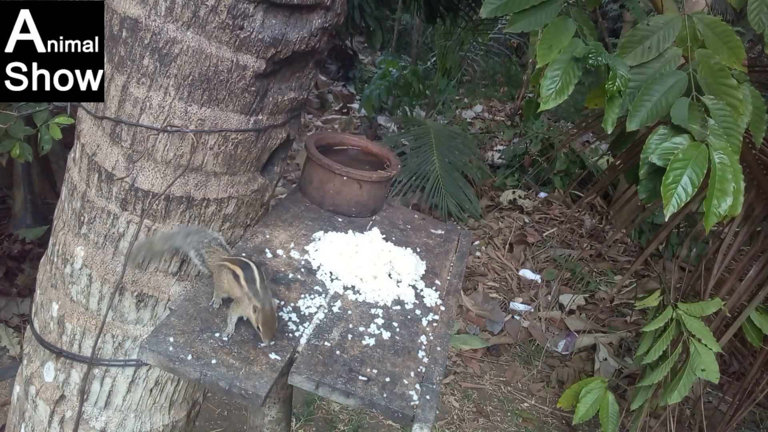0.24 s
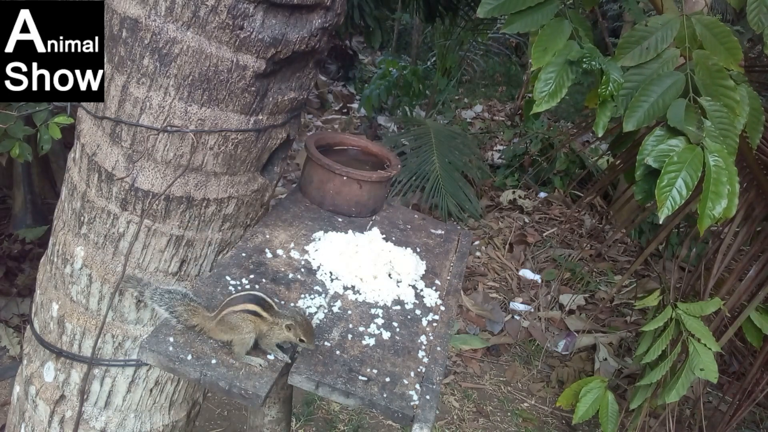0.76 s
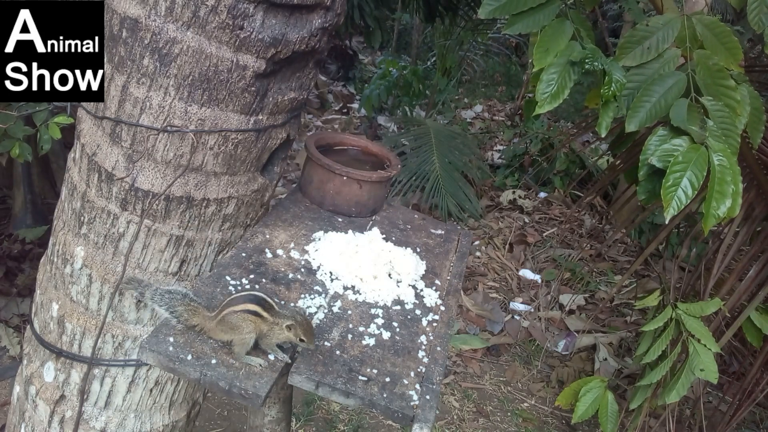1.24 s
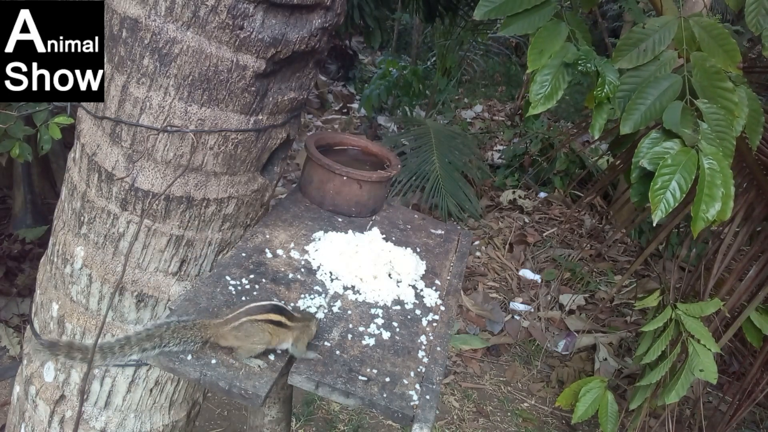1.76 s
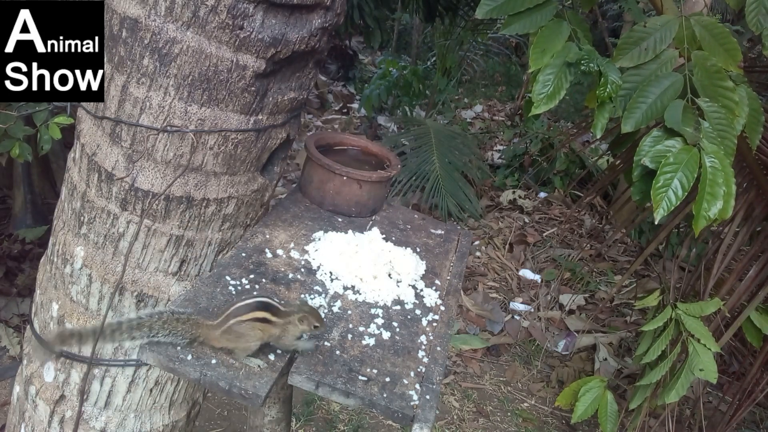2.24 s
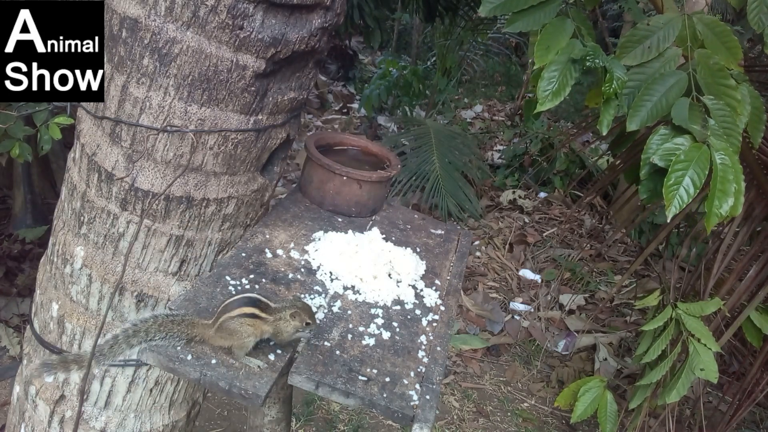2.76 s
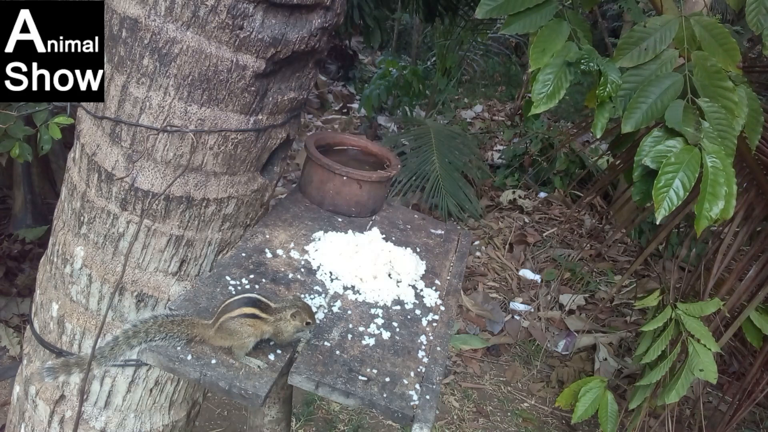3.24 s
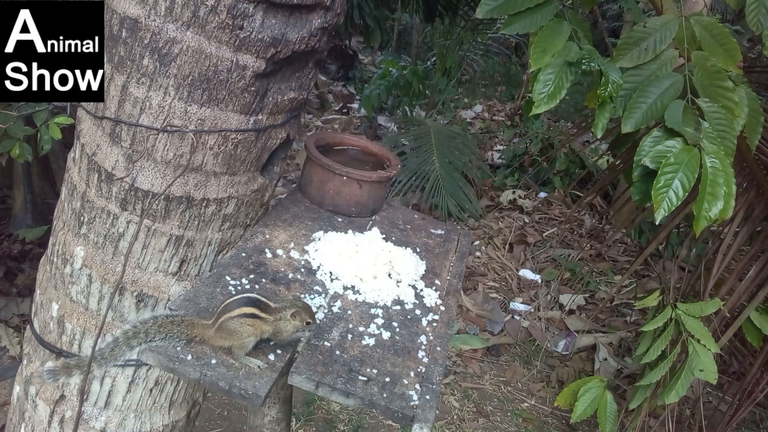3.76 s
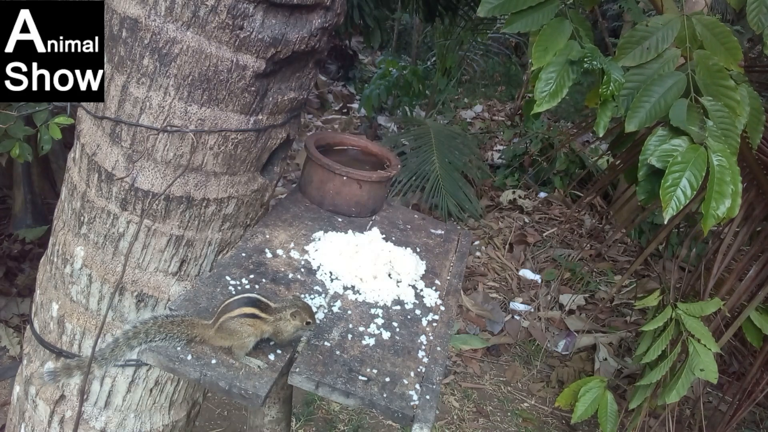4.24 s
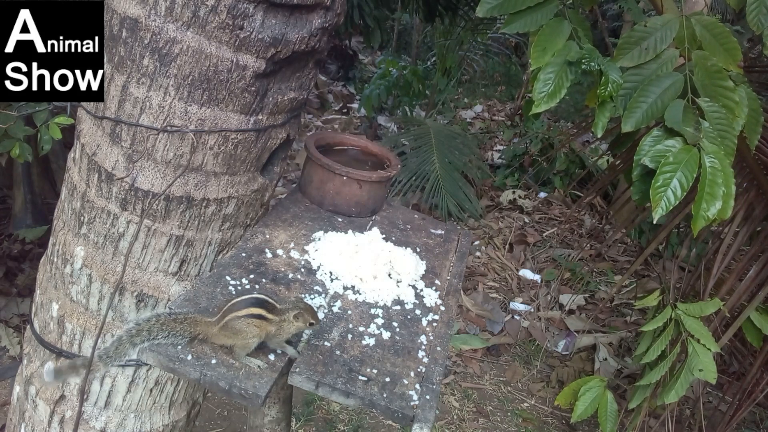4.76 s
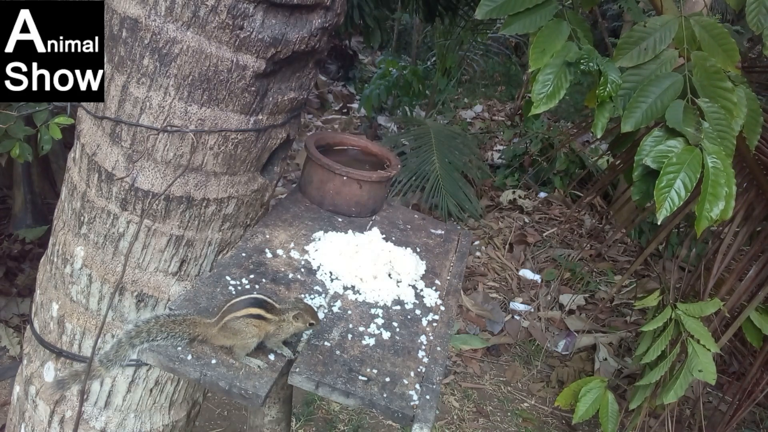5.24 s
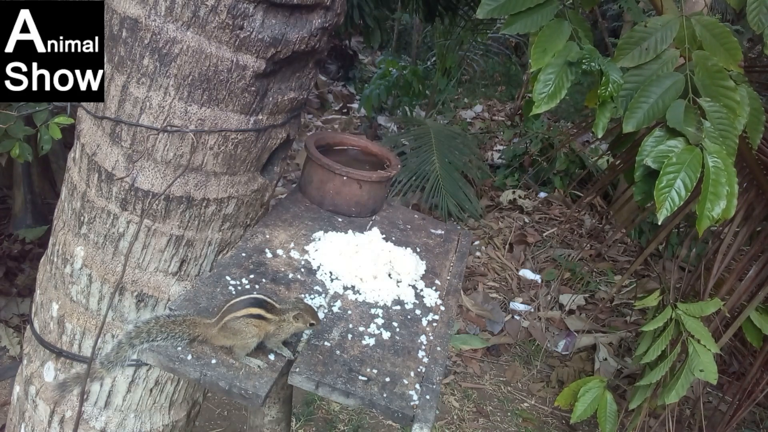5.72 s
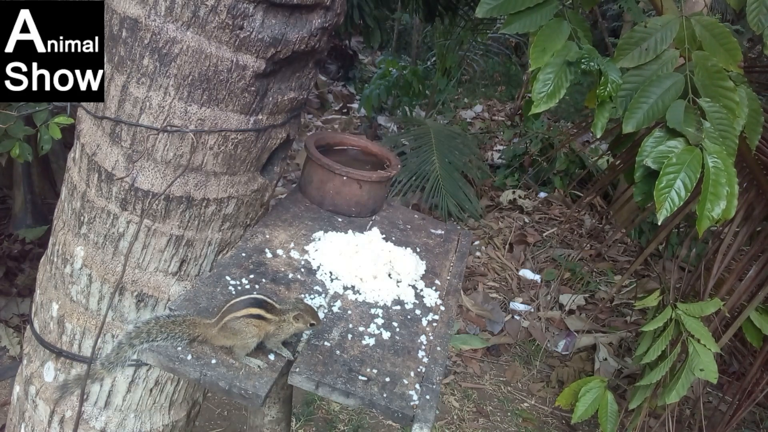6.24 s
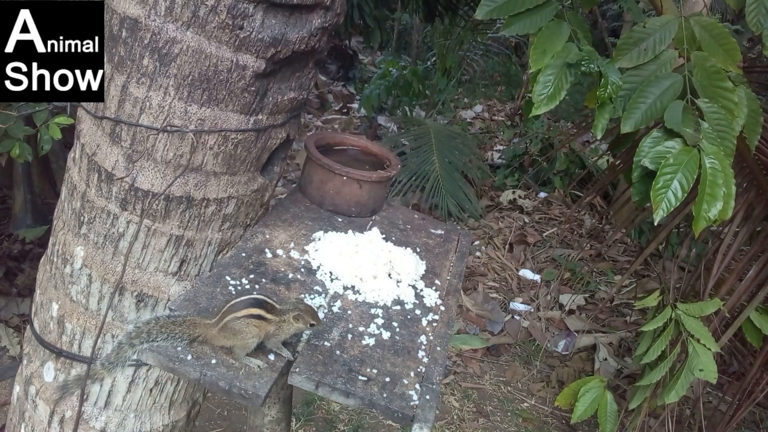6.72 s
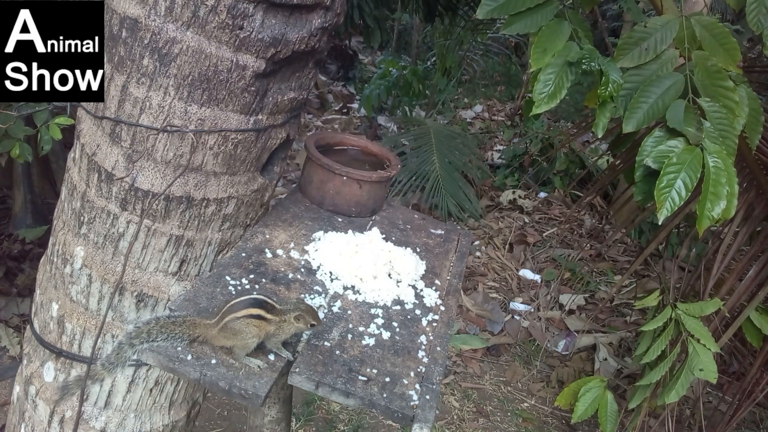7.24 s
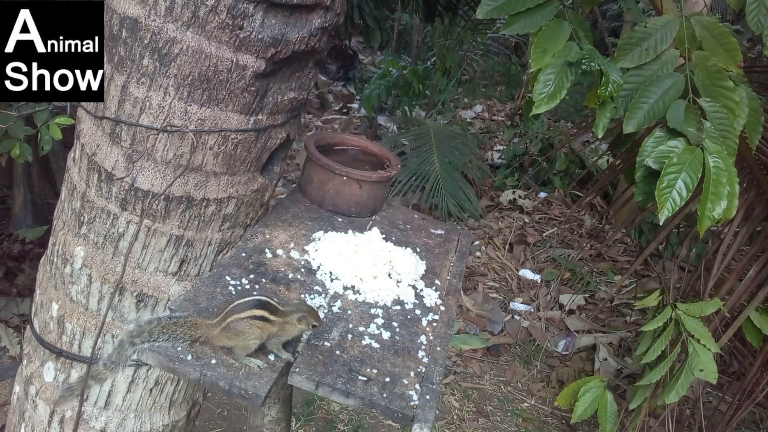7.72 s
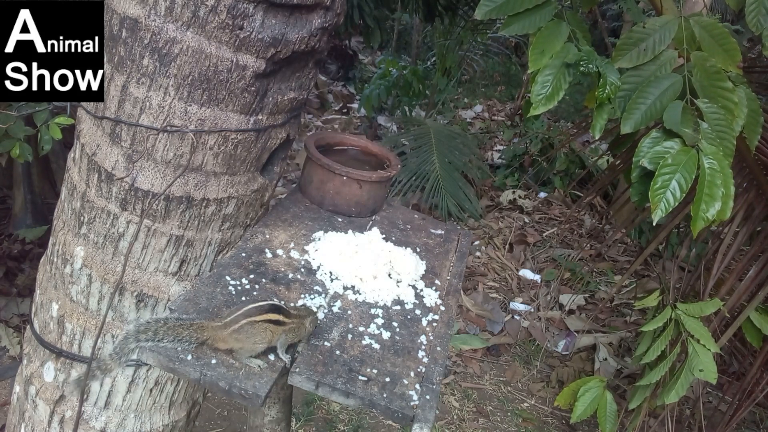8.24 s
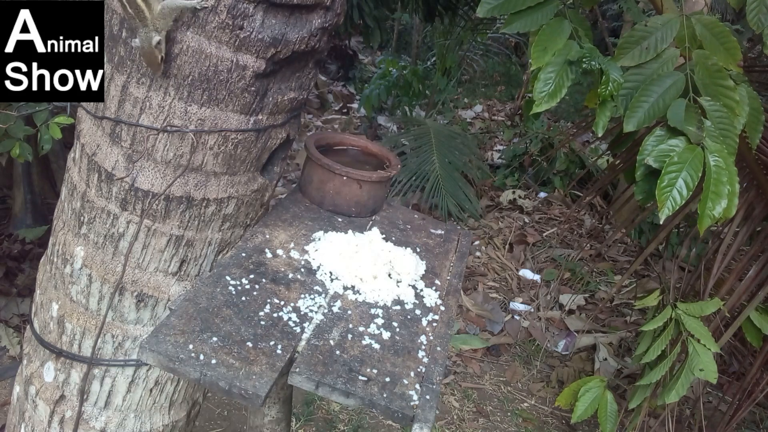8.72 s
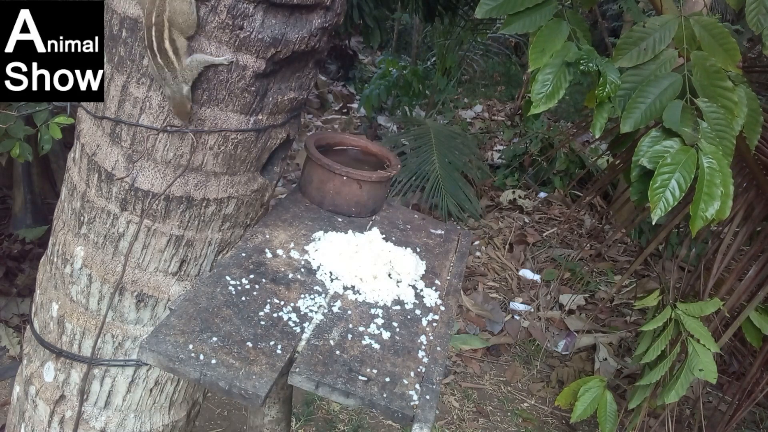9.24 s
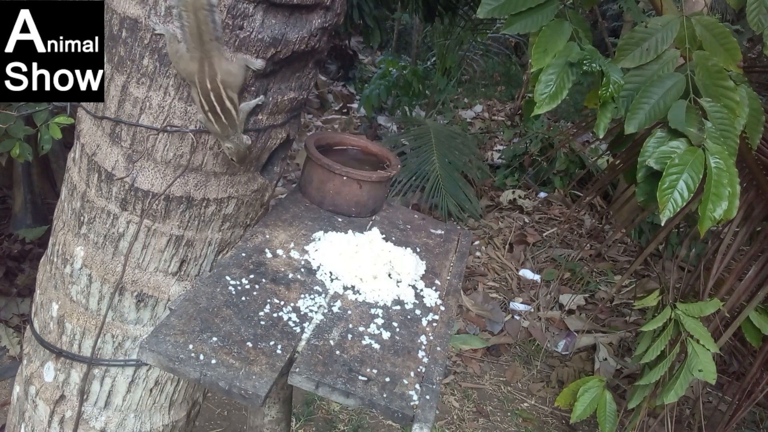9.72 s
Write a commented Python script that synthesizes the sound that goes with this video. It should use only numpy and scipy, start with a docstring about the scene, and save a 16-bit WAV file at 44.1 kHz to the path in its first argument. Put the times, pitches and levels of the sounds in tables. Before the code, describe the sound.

Short, bright, slightly hoarse squirrel chirps echo off walls and leaves. One strong chirp opens, then soft background with distant bird whistles. Midway, light metal rattling grows into two hard blows, deep panel boom and a metallic latch clank, by far the loudest moment. Afterwards the squirrel chirps repeatedly in quick, uneven succession and stops, leaving faint claw scuffs, a tick, birds and low outdoor rumble. The single outdoor microphone picks up everything in mono.

```python
"""A palm squirrel chirps on a stone feeding table in a walled garden: harmonics of a gliding pitch
pass through throat resonances. Its claws scratch on stone and bark, as short bursts of noise.
Out of sight sheet metal, likely a gate, rattles, booms and slams on its latch: struck modes and dying noise.
Far away birds whistle as gliding tones; insects, traffic, rumble and air are shaped noise.
Echoes off walls and leaves set the distance of all but the gate and the background."""
import sys
import numpy as np
from scipy import signal
from scipy.fft import rfft, irfft, next_fast_len
from scipy.io import wavfile
from scipy.ndimage import map_coordinates

SR = 44100
rng = np.random.default_rng(int(sys.argv[2]) if len(sys.argv) > 2 else 0)


def pcm_store(signal):
    """Save signal as 16-bit PCM."""
    levels = np.round(np.clip(np.atleast_2d(signal), -1, 1) * 32767)
    wavfile.write(sys.argv[1], SR, levels.astype(np.int16).T)


N = 440118

# Chirps: (t/s, held pitch f/Hz, level/dB, octave level/dB, higher overtones level/dB, echoes level/dB)
CHIRP_NOTES = [(-.1, 2325, -42, 7, -5, -1.5), (.065, 2354, -39, 0.5, -2, -1),
               (.248, 2552, -24, 1.5, -18.5, -7.5), (3.979, 2200, -35, 2, -1.5, -2.5),
               (4.317, 2146, -33.5, 2, 1.5, -6), (4.603, 2585, -27.5, 2.5, -6, -1.5),
               (6.002, 2547, -37, 4, -4, 3), (6.266, 2520, -31.5, 12, -1, -3.5),
               (6.373, 2186, -36, -2.5, -3, -1), (6.524, 2255, -37, 3, -2.5, .5),
               (6.656, 2584, -34.5, 4, 1.5, 5), (6.868, 2534, -30, -0.5, 0, 1),
               (7.13, 2536, -29.5, 7, 1.5, 3), (7.338, 2487, -36.5, 6, 5, 2), (7.458, 2495, -34, 5, 3.5, 4),
               (7.574, 2479, -30.5, 7, 2, 2.5), (7.74, 2486, -33, 7, 5, 4),
               (7.992, 2480, -36.5, 4, 3.5, 3.5), (8.189, 2443, -39, 4, 4, 4.5),
               (8.387, 2453, -38, 4.5, 3.5, 3.5)]
# Squeaks that flick up as the voice catches: (t/s, level/dB)
SQUEAK_NOTES = [(0.243, -53), (3.971, -41), (4.31, -39.5), (4.598, -49), (5.996, -54.5), (6.259, -49.5),
                (6.371, -54)]
# Response of the squirrel's throat: (f/Hz, level/dB)
THROAT_RESPONSE = [(1400, -52), (2000, -1.5), (2500, 0.5), (3200, -11.5), (4200, -11.5), (4600, -20.5),
                   (5100, -13), (6100, -3), (7400, -20), (8600, -20), (9900, -34), (11100, -21),
                   (11600, -22.5), (12400, -19), (13300, -22), (15000, -34)]
USUAL_HZ, USUAL_DB = 2500, -34  # the usual chirp, from which the others depart
HOLD_S, HOLD_S_PER_OCTAVE = .024, 0.0266  # notes below the usual pitch are held longer
ROUGH, ROUGH_PER_OCTAVE = 0.23, 1.27  # and are hoarser
HOLD_S_PER_DB, ROUGH_PER_DB = .0004, 0.03  # brighter notes are shorter and hoarser
FALL_DB, FALL_TOP_DB = -8, -4.5  # level of the closing fall: usual and highest
FALL_DB_PER_DB, FALL_DB_PER_OCTAVE = 0.8, 68  # loud and high notes cut off more cleanly
# Pitch: the rise into the note (s, fraction) and its creep while held (fraction per s)
SCOOP_S, SCOOP_DEPTH, CREEP_PER_S = 0.01313, 0.2492, 1
SAG_S, SAG_DEPTH, RELEASE_S = .017, .18, 0.0039  # the closing fall: s, fraction of pitch, s
SAG_ROUGH = 0.35  # the voice breaks up as it falls
SQUEAK_S, SQUEAK_FROM_HZ, SQUEAK_TO_HZ = 0.0188, 4950, 6210

# Sharp ticks of claws, twigs and metal: (t/s, peak level/dB, centre f/Hz)
TICK_TIMES = [(.2, -32, 2290), (2.523, -52, 2500), (4.221, -30, 1180), (4.858, -24.5, 3480),
              (6.84, -33, 2500), (6.949, -35, 1440), (9.41, -40.5, 1640), (9.429, -50, 3500)]
# Scuffs of feet and tail: (t/s, length/s, level/dB, centre f/Hz)
SCUFF_TIMES = [(.29, .04, -59.5, 600), (1.036, .094, -71, 5030), (1.464, .068, -66, 4420),
               (2.898, .19, -63, 5800), (3.093, .11, -62.5, 6050), (4.118, .16, -52, 2200),
               (5.329, .07, -64, 8700), (6.794, 0.31, -57.5, 6000), (6.809, .15, -54.5, 1520),
               (8.679, 0.14, -66, 6960), (9.232, .16, -61.5, 1710), (9.266, 0.13, -59, 7400)]
# Claws catch at random during a scuff: rate, middle peak over the scuff's level and its spread
SNAGS_PER_S, SNAG_DB, SNAG_SPREAD_DB = 30, 9, 5
CONTACT_WIDTH = 1.7  # bandwidth over centre of each of the three filter stages for ticks and scuffs

# Blows on the gate: (t/s, clatter level/dB, boom level/dB, hardness of contact f/Hz, swell/s)
GATE_BLOWS = [(4.02, -47.5, -58, 600, .003), (4.118, -47.5, -62, 3500, 0.0034),
              (4.156, -45, -65, 3500, .003), (4.217, -36.5, -46.5, 1500, 0.0013),
              (4.857, -30, -24, 13000, 0.02), (5.426, -27, -33.5, 15000, 0.011)]
# Booming modes of the gate's panel: (f/Hz, level/dB, t60/s)
PANEL_MODES = [(66.4, -7, 2.56), (92, 0, 1.7), (101.3, -8, 1.8), (120.3, -2, 1.75), (140, -8.5, 1.57),
               (182.7, -14.5, 1.4), (205.6, -9.5, 1.02), (269.7, -3.5, 0.97), (415, -14, 1.13),
               (488, -19, 1.2), (651, -22, 1.4), (703, -25, 1.1), (818, -17.5, 1.35), (1047, -21, 1.1)]
# Ringing modes of the gate's steel latch: (f/Hz, level/dB, t60/s)
LATCH_MODES = [(2440, -5, 0.4), (3960, -13, 0.22), (5120, -2.5, 0.3), (5470, -8, 0.5), (5800, -10, 0.38),
               (6730, -3, 0.48), (7360, -5, 0.47), (7620, -3, 0.32), (9900, 0, 0.21), (11030, 0, 0.2),
               (12480, -5, 0.32), (13010, -9, 0.26), (13290, -9, 0.27)]
# The panel's crowded higher modes: (f/Hz, level per Hz/dB)
CLATTER_COLOUR = [(25, -32), (55, -5), (105, 3), (160, -5), (230, 2), (330, -10.5), (420, -7.5),
                  (650, -11.5), (1050, -14), (1350, -18), (1700, -25), (3900, -28), (5500, -32),
                  (8500, -34.5), (15500, -43.5)]
# Decay of those modes, before a heavy blow stretches it: (f/Hz, t60/s)
CLATTER_DECAY = [(100, 0.85), (400, 0.83), (1200, 0.77), (5000, 0.74), (14000, 0.62)]
HEAVY_DB = -31.5  # from this clatter level up a blow moves the whole panel
LATCH_S, LATCH_DB = 5.433, -31.5  # the latch catches on the last blow
RATTLE_TILT_DB = 7  # lighter blows are thinner
FREE_RING = 1.61  # a heavy blow clatters this many times longer while the latch is still open

# A far bird's phrase, a rising slur and an arch:
# (delay t/s, length/s, first f/Hz, middle f/Hz, last f/Hz, octave level/dB)
BIRD_PHRASE = [(0, .3, 1940, 2097, 2200, -0.5), (.19, .21, 2250, 2443, 2160, -11.5)]
# When that phrase is sung: (t/s, slur level/dB, arch level/dB)
BIRD_SONGS = [(.37, -75, -68.5), (1.54, -70, -65.5), (2.6, -71.5, -67), (3.42, -82, -75),
              (8.43, -84, -64.5), (9.65, -74.5, -66)]
# Other birds' single slurs: (t/s, first f/Hz, last f/Hz, level/dB)
BIRD_SLURS = [(1.87, 2214, 2070, -66), (2.08, 4880, 4720, -72.5), (3.49, 4400, 4940, -64.5),
              (3.58, 4760, 3770, -67), (3.8, 6200, 4760, -71), (3.86, 3680, 3780, -75),
              (5.69, 4880, 4500, -69), (8.85, 3050, 2880, -71), (9.42, 4800, 4480, -72)]
SLUR_S, QUAVER = 0.11, 0.0144  # length of a slur; unsteadiness of all whistles (fraction of pitch)

# Course of the background before and after the gate, ahead of the offsets below:
# (t/s, rumble level/dB, bass level/dB)
BACKGROUND_LEVELS = [
    [(0.0, -63.5, -64.5), (1.12, -67.5, -69.5), (1.31, -65, -69), (3.9, -65.5, -69)],
    [(6.5, -59, -63), (8.41, -60, -65.5), (8.76, -61.5, -62), (9.98, -62, -64.5)],
]
# Colour of the rumble and its bass: (f/Hz, level per Hz/dB)
RUMBLE_COLOUR = [(22, -16), (42, -5), (65, 1), (100, -4), (160, -10.5), (260, -8), (400, -12.5), (700, -12),
                 (1000, -20), (1800, -22.5), (4000, -29), (15500, -38.5)]
# Colour of the outdoor air: (f/Hz, level per Hz/dB)
AIR_COLOUR = [(500, 6.5), (1500, -2), (2300, 2.5), (3300, 2), (5200, -5.5), (8500, -15), (12500, -9),
              (15500, -21)]
# Swells of far traffic: (middle t/s, half length/s, level/dB)
TRAFFIC_PASSES = [(1.5, 0.65, -66), (2.702, 0.3, -64.5), (3.85, 0.35, -69.5), (8.2, 2.4, -72.5)]
DRONE_DB = -84  # floor under the traffic swells
RUMBLE_DB = 0.62  # offset on the course of the rumble
BASS_DB, BASS_BELOW_HZ = 3, 138  # offset on the course of the bass; its upper edge

# First echoes off the walls, each delay varied by up to a tenth: (delay t/s, level/dB)
WALL_ECHOES = [(.0065, -10.5), (0.0112, -11.5), (.016, -10), (.022, -19), (.031, -23), (.043, -32.5)]
# Decay of the garden's far tail: (f/Hz, t60/s)
GARDEN_DECAY = [(500, 1), (2500, 0.72), (6000, 0.74), (13000, 0.16)]
TOP_HZ = 15750  # upper band limit of the microphone channel


def squirrel():
    """Chirps shaped by their pitch and force, and squeaks; echoes change as the animal turns its head."""
    out = np.zeros(N)
    outdoors = lambda x, echo_db: garden(x, echo_db, near_db=-4, near_t60=.26, far_db=-14)
    for s, hz, db, octave_db, bright_db, echo_db in CHIRP_NOTES:
        octaves_low = np.log2(USUAL_HZ / hz)
        hold = HOLD_S + HOLD_S_PER_OCTAVE * octaves_low - HOLD_S_PER_DB * bright_db
        rough = np.clip(ROUGH + ROUGH_PER_OCTAVE * octaves_low + ROUGH_PER_DB * bright_db, 0, 1)
        fall_db = FALL_DB - FALL_DB_PER_DB * (db - USUAL_DB) + FALL_DB_PER_OCTAVE * octaves_low
        note = chirp(hz, octave_db, bright_db, hold, min(fall_db, FALL_TOP_DB), rough)
        add(out, s, amp(db) * outdoors(note, echo_db))
    for s, db in SQUEAK_NOTES:
        add(out, s, amp(db) * outdoors(squeak(), echo_db=-4))
    return out


def chirp(hz, octave_db, bright_db, hold, fall_db, rough):
    """One note: it scoops up, locks on its pitch, then sags and turns hoarse."""
    t = clock(0.25)
    scoop = np.clip(1 - t / SCOOP_S, 0, 1)
    sag = np.clip((t - hold) / SAG_S, 0, 1.2)
    hoarse = rough + SAG_ROUGH * sag
    jitter = .052 * hoarse * wobble(1400, len(t))
    lift = CREEP_PER_S * (np.minimum(t, hold) - .017)  # the held pitch creeps upward as pressure builds
    pitch = hz * (1 - SCOOP_DEPTH * scoop ** 2 + lift - SAG_DEPTH * sag) * (1 + jitter)
    phase = 2 * np.pi * np.cumsum(pitch) / SR
    voice = amp(along(THROAT_RESPONSE, pitch)) * np.sin(phase)
    for k in range(2, 8):
        # overtones come in once the pitch has locked, and each flutters on its own
        flutter_db = (2 + 4 * hoarse) * wobble(260, len(t))
        overtone_db = (octave_db if k == 2 else bright_db) - 0.45 - 28 * scoop + flutter_db
        voice += amp(along(THROAT_RESPONSE, k * pitch) + overtone_db) * np.sin(k * phase)
    breath = rng.standard_normal(len(t))
    rasp = unit(filtered(breath, lambda f: amp(along(THROAT_RESPONSE, f)) * (f > 1.4 * hz)))
    # clean notes snap in, hoarse ones swell
    opening = 1 / (1 + np.exp(-(t - .0105) / (0.0018 + 0.01 * rough)))
    release = 1 / (1 + np.exp((t - hold - .018) / RELEASE_S))
    closing = amp(fall_db * np.minimum(2 * sag, 1)) * release
    return opening * closing * (np.sqrt(2) * voice + amp(-9 + bright_db) * hoarse * rasp)


def squeak():
    """A short unsteady upward glide; uneven cycles of the voice add the octave below."""
    t = clock(SQUEAK_S)
    glide = np.linspace(SQUEAK_FROM_HZ, SQUEAK_TO_HZ, len(t))
    pitch = glide * (1 + 0.072 * wobble(1400, len(t)))
    phase = 2 * np.pi * np.cumsum(pitch) / SR
    return 2 * np.hanning(len(t)) * (np.sin(phase) + amp(-6) * np.sin(phase / 2))


def scratches():
    """Single ticks, and scuffs of grainy friction noise in which a claw now and then snags."""
    out, t = np.zeros(N), clock(.03)
    contact_band = lambda hz: lambda f: resonance(hz, CONTACT_WIDTH * hz)(f) ** 3
    snags = []
    for s, length, db, hz in SCUFF_TIMES:
        size = int(length * SR)
        grains = rng.standard_normal(size) * amp(4.6 * wobble(300, size))
        scuff = unit(filtered(grains, contact_band(hz))) * signal.windows.tukey(size, .5)
        add(out, s, amp(db) * scuff)
        for _ in range(round(SNAGS_PER_S * length)):
            snag_s = s + length * rng.random()
            snag_db = db + SNAG_DB + SNAG_SPREAD_DB * rng.standard_normal()
            snags.append((snag_s, snag_db, hz))
    for s, db, hz in TICK_TIMES + snags:
        burst = rng.standard_normal(len(t)) * amp(-60 * t / 0.011)
        tick = filtered(burst, contact_band(hz))
        add(out, s, amp(db) * tick / np.abs(tick).max())
    return garden(out, echo_db=-2, near_db=-7, near_t60=.25, far_db=-11)[:N]


def gate():
    """Each blow sets the panel booming and clattering; the last one rings the latch."""
    out, t = np.zeros(N), clock(1.5)
    for s, clatter_db, boom_db, hard_hz, swell in GATE_BLOWS:
        weight = min(amp(clatter_db - HEAVY_DB) ** 4, 1)
        clatter = panel_clatter(t, weight, hard_hz, latch_open=s < GATE_BLOWS[-1][0])
        # the big panel takes time to swing
        boom = ring(PANEL_MODES, t, drift=0.76, drift_rate=22.14) * (1 - np.exp(-t / 0.035))
        add(out, s, (1 - np.exp(-t / swell)) * (amp(boom_db) * boom + amp(clatter_db) * clatter))
    latch = ring(LATCH_MODES, t, drift=0.73, drift_rate=180) * (1 - np.exp(-t / 0.016))
    add(out, LATCH_S, amp(LATCH_DB) * latch)
    return out


def panel_clatter(t, weight, hard_hz, latch_open):
    """Crowded panel modes as dying noise; a soft contact dulls them and a light blow thins them."""
    tilt_db = RATTLE_TILT_DB * (1 - weight)
    stretch = FREE_RING ** weight if latch_open else 1

    def colour(f):
        """Mode levels, tilted for a light blow and rolled off by the contact."""
        level_db = along(CLATTER_COLOUR, f) + tilt_db * np.log10(1 + f / 300)
        return amp(level_db) / np.hypot(1, f / hard_hz)

    decay = [(hz, stretch * t60) for hz, t60 in CLATTER_DECAY]
    clatter = filtered(dying_noise(decay, 1.5), colour) * amp(wobble(71.7, len(t)))
    return clatter / np.std(clatter[:SR // 10])  # the first tenth of a second sets the level


def birds():
    """One bird repeats its phrase and others add thin slurs, all blurred by distance."""
    out = np.zeros(N)
    for s, *levels in BIRD_SONGS:
        for (delay, length, *pitches, octave_db), db in zip(BIRD_PHRASE, levels):
            add(out, s + delay, amp(db) * whistle(length, pitches, amp(octave_db)))
    for s, *pitches, db in BIRD_SLURS:
        add(out, s, amp(db) * whistle(SLUR_S, pitches, 0))
    return garden(out, echo_db=1, near_db=-2, near_t60=.25, far_db=-7)[:N]


def whistle(length, pitches, octave):
    """A note that swells and fades while gliding smoothly through its pitches."""
    u = clock(length) / length
    knots = np.linspace(0, 1, len(pitches))
    glide = np.polyval(np.polyfit(knots, pitches, len(pitches) - 1), u)
    phase = 2 * np.pi * np.cumsum(glide * (1 + QUAVER * wobble(251, len(u)))) / SR
    return np.sin(np.pi * u) * (np.sin(phase) + octave * np.sin(2 * phase))


def background():
    """Outdoor rumble and air, a far drone of traffic and a steady band of insects, all shaped noise."""
    t = np.arange(N) / SR
    noise = lambda response: unit(filtered(rng.standard_normal(N), response))
    times, *levels = np.vstack(BACKGROUND_LEVELS).T
    rumble_db, bass_db = [np.interp(t, times, level) for level in levels]
    # bass and rumble share one colour, split by power at the bass edge
    deep = lambda f: 1 / (1 + (f / BASS_BELOW_HZ) ** 6)
    bass = noise(lambda f: amp(along(RUMBLE_COLOUR, f)) * np.sqrt(deep(f)))
    bass *= amp(BASS_DB + bass_db + wobble(3, N))
    rumble = noise(lambda f: amp(along(RUMBLE_COLOUR, f)) * np.sqrt(1 - deep(f)))
    rumble *= amp(RUMBLE_DB + rumble_db + wobble(6.6, N))
    air = noise(lambda f: amp(along(AIR_COLOUR, f))) * amp(-73.0 + wobble(1.5, N) / 2)
    swells = sum(amp(db) * np.exp(-((t - s) / half) ** 2) for s, half, db in TRAFFIC_PASSES)
    traffic = amp(DRONE_DB) + swells
    drone = noise(lambda f: resonance(690, 150)(f) ** 2) * traffic * amp(wobble(9.5, N))
    insects = noise(lambda f: resonance(6880, 1050)(f) ** 2) * amp(-71.0 + 0.26 * wobble(5.2, N))
    return bass + rumble + air + drone + insects


def garden(x, echo_db, near_db, near_t60, far_db):
    """Direct sound, wall echoes, scatter from nearby leaves and a long faint tail."""
    t = clock(1)
    near = rng.standard_normal(len(t)) * amp(-60 * t / near_t60) * (1 - np.exp(-(t / 0.02) ** 2))
    far = dying_noise(GARDEN_DECAY, 1) * (1 - np.exp(-t / 0.022))
    echoes = amp(near_db) * near / np.linalg.norm(near) + amp(far_db) * far / np.linalg.norm(far)
    for delay, db in WALL_ECHOES:
        echoes[int(delay * rng.uniform(.9, 1.1) * SR)] += amp(db)
    direct = t == 0
    return signal.fftconvolve(x, direct + amp(echo_db) * echoes)


def ring(modes, t, drift, drift_rate):
    """Struck modes with wandering phases (drift in radians), starting near rms 1."""
    gains = np.array([amp(db) for _, db, _ in modes])
    waves = []
    for hz, _, t60 in modes:
        phase = 2 * np.pi * (hz * t + rng.random()) + drift * wobble(drift_rate, len(t))
        waves.append(amp(-60 * t / t60) * np.sin(phase))
    return np.sqrt(2) * gains @ np.array(waves) / np.linalg.norm(gains)


def dying_noise(t60s, length):
    """Noise in which each frequency dies at its own speed."""
    size = int(length * SR)
    hz, t, z = signal.stft(rng.standard_normal(size), SR, nperseg=256)
    decay = amp(-60 * t / along(t60s, hz)[:, None])
    return signal.istft(z * decay, SR, nperseg=256)[1][:size]


def resonance(centre, width):
    """Response of one damped resonance."""
    return lambda f: 1j * f * width / (centre ** 2 - f ** 2 + 1j * f * width)


def filtered(x, response):
    """x times a response of frequency."""
    m = next_fast_len(len(x) + 8192)
    return irfft(rfft(x, m) * response(np.fft.rfftfreq(m, 1 / SR)), m)[:len(x)]


def wobble(rate, size):
    """A smooth random curve, rate knots a second."""
    knots = rng.standard_normal(int(size * rate / SR) + 4)
    return map_coordinates(knots, [np.arange(size) * rate / SR], mode="nearest")


def along(points, hz):
    """(f/Hz, value) points read on a log frequency axis."""
    f, v = np.transpose(points)
    return np.interp(np.log(hz + 1), np.log(f + 1), v)


def amp(db):
    """Decibels to gain."""
    return 10 ** (np.asarray(db) / 20)


def unit(x):
    """Scaled to rms 1."""
    return x / np.sqrt(np.mean(x ** 2) + 1e-20)


def clock(length):
    """Sample times over a length in seconds."""
    return np.arange(int(length * SR)) / SR


def add(track, s, x):
    """Mix x into the track from time s, cutting what lies outside it."""
    start = round(s * SR)
    x = x[max(-start, 0):max(N - start, 0)]
    track[max(start, 0):][:len(x)] += x


def scene():
    """All sources, near and far, at one microphone."""
    return (squirrel() + gate() + scratches() + birds() + background())[None]


def record(dry):
    """The microphone channel keeps nothing above its band limit."""
    return np.array([filtered(channel, lambda f: f < TOP_HZ) for channel in dry])


dry = scene()
out = record(dry)
pcm_store(out)
```